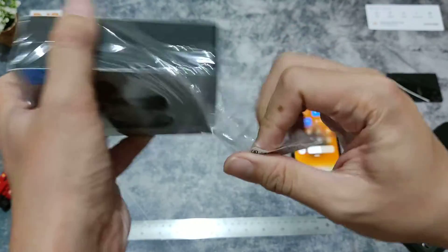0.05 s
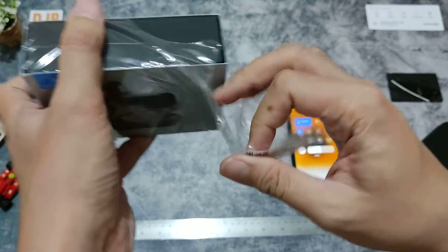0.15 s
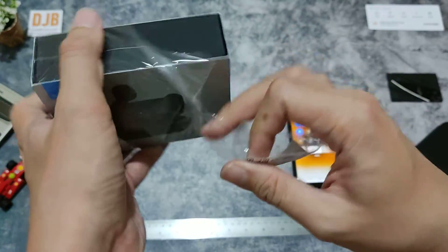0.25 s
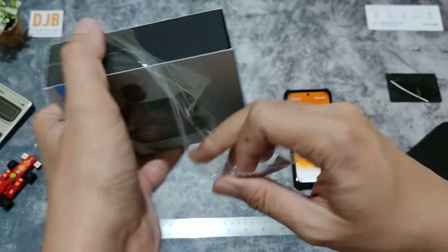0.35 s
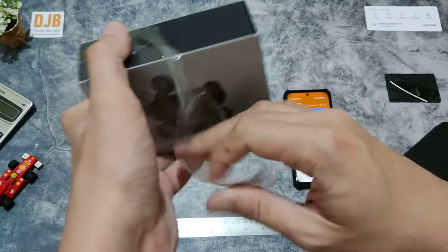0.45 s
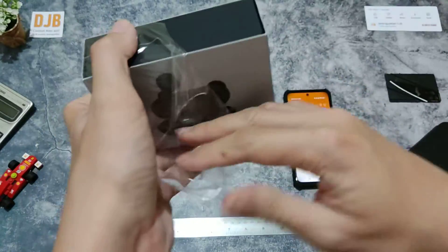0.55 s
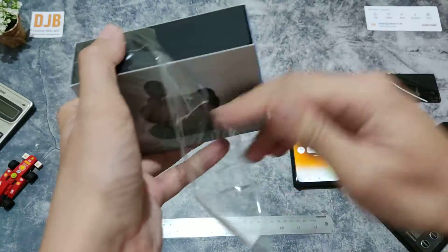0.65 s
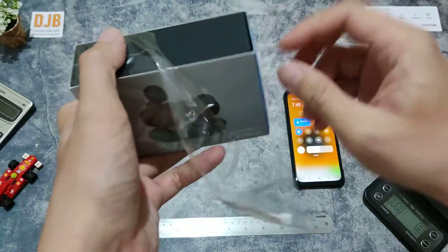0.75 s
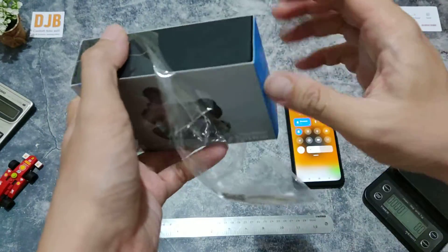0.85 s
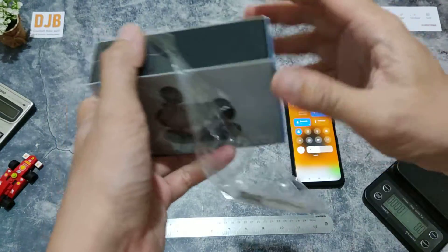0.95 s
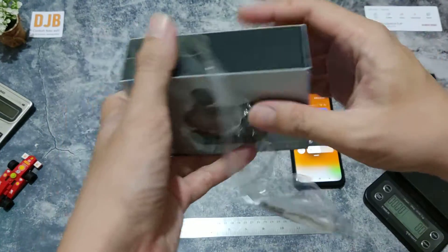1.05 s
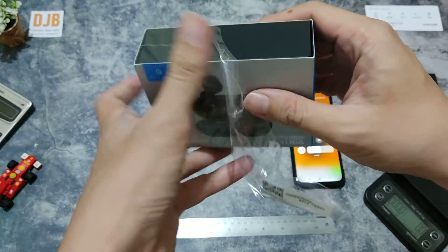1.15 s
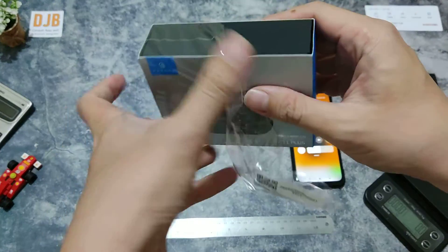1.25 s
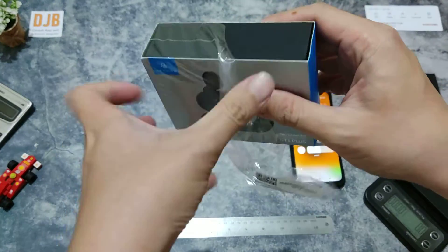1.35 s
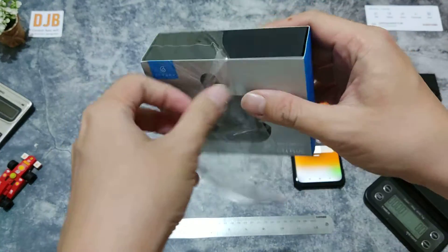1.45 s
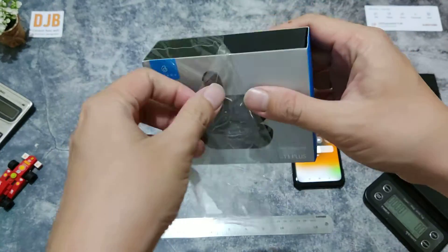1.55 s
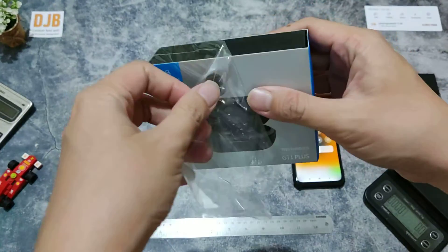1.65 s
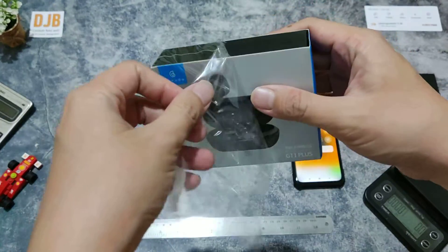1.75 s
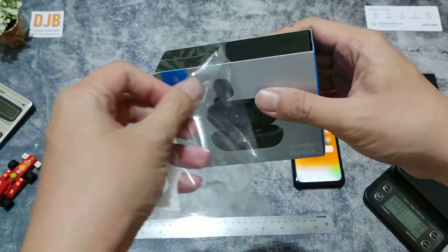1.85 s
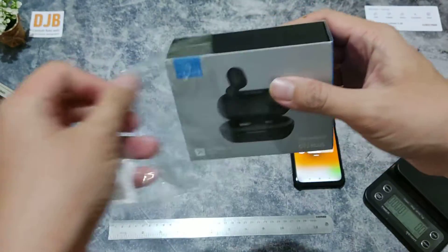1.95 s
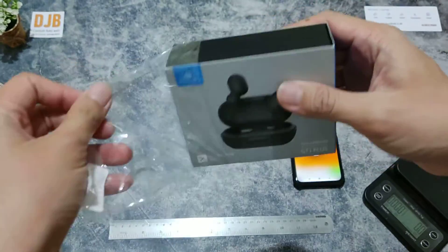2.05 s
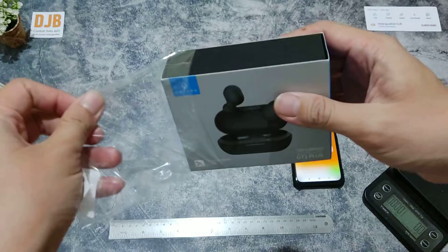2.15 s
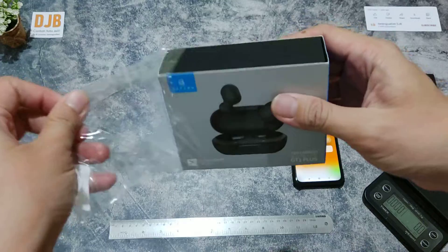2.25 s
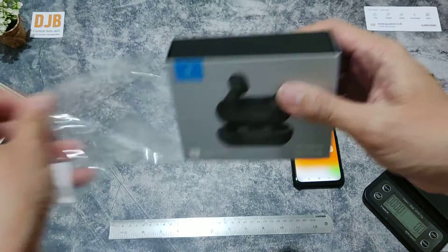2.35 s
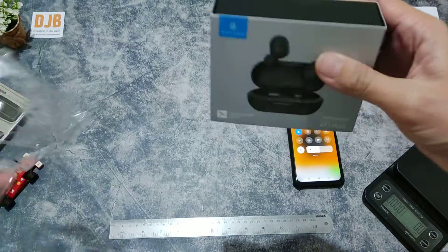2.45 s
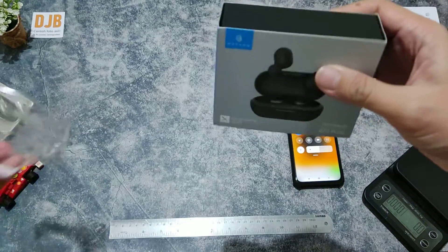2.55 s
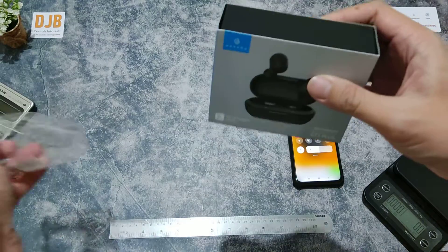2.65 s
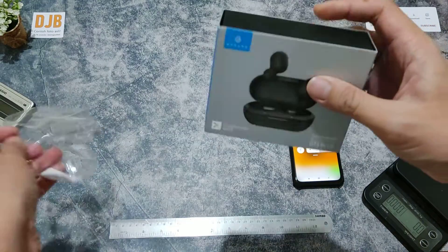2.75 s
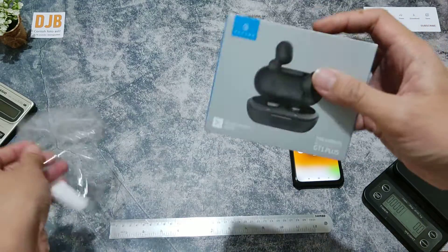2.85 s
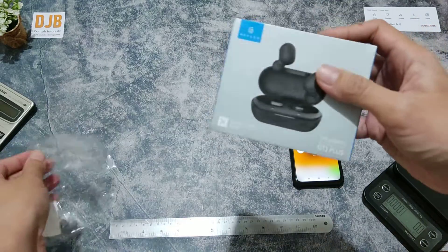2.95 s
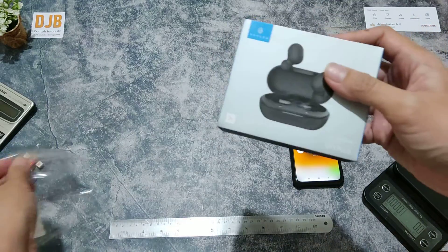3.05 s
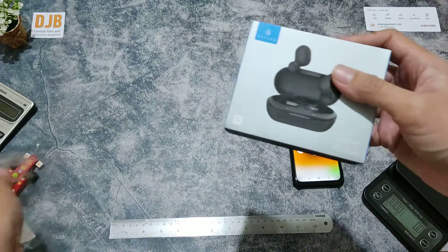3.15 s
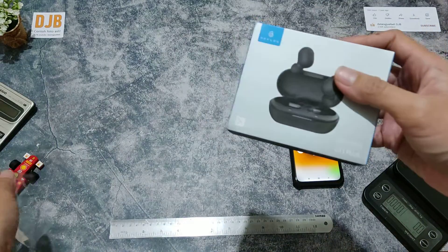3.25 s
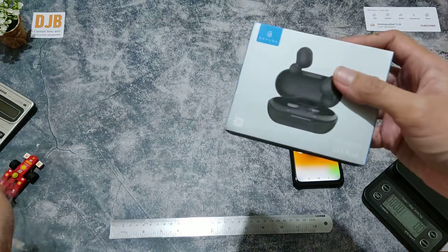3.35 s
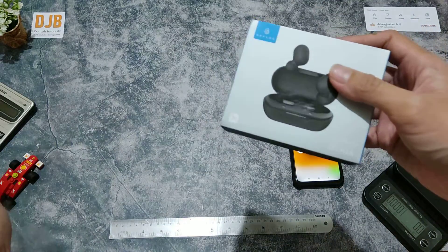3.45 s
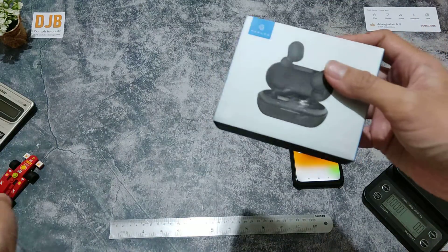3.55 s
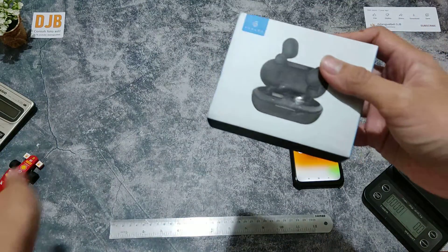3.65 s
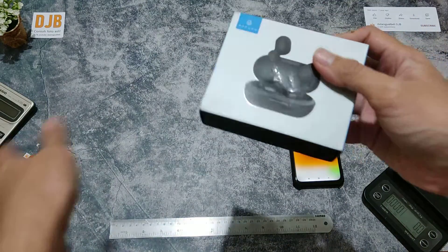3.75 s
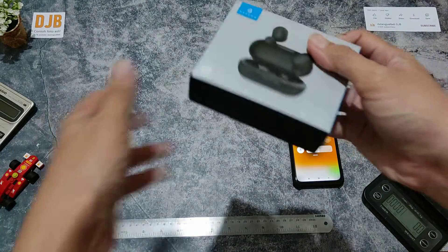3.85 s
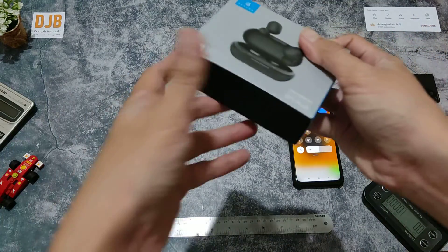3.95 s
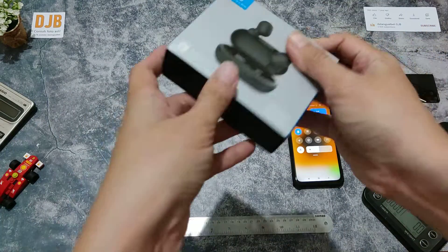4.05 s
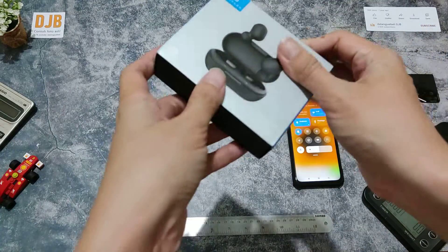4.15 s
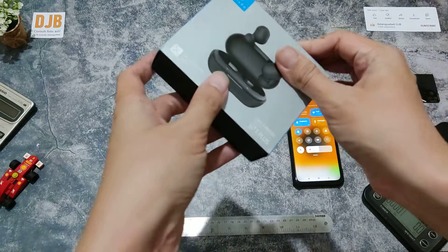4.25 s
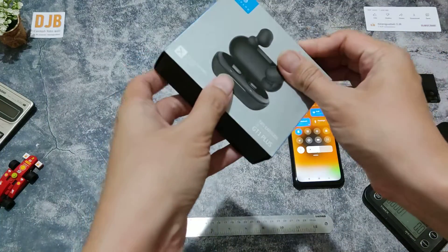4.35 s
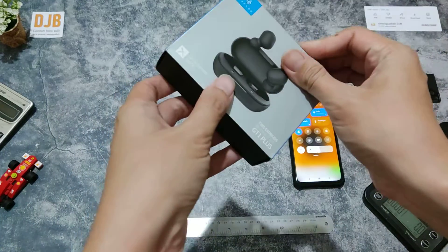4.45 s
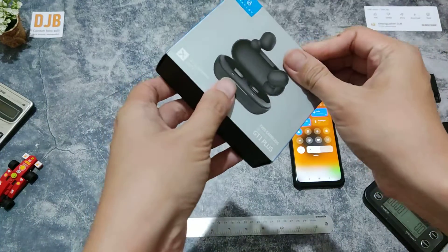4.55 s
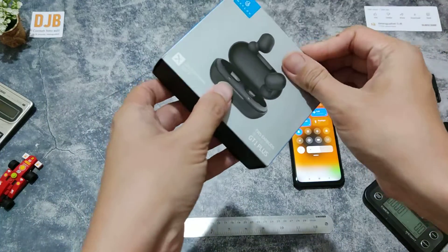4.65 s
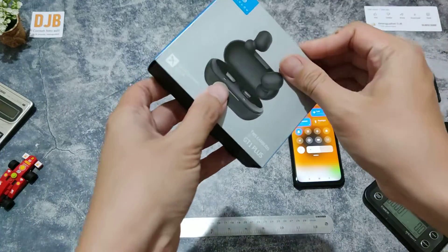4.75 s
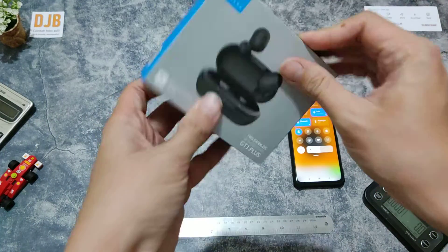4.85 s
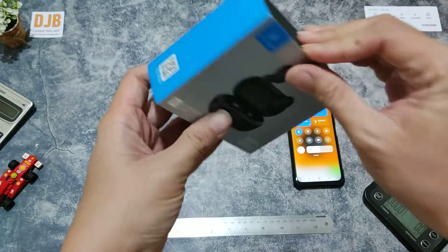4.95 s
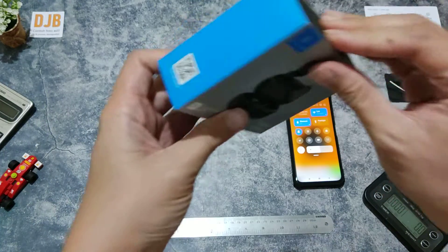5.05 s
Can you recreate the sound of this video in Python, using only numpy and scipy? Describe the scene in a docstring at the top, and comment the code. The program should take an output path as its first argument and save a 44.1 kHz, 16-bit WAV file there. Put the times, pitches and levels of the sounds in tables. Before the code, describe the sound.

Thin clear plastic film crackles and snaps loudly as it is torn off a small cardboard box, then quiet finger handling of the card.

```python
"""Thin plastic film is peeled off a small cardboard box close to two spaced microphones.
Sharp snaps, made of tight groups of ringing cracks, stand out over a dense crinkle of tiny ticks and hiss.
Knocks ring the box as short dying tones; later, fingers slide on the card with a softer scuff.
A quiet room rumbles behind with a faint tone. Near echoes and a short tail surround the handling;
the two microphone ports color the treble differently, and the level ducks after loud cracks."""
import sys
import numpy as np
from scipy import signal
from scipy.fft import rfft, irfft, next_fast_len
from scipy.io import wavfile
from scipy.ndimage import uniform_filter1d, map_coordinates

SR = 44100
rng = np.random.default_rng(int(sys.argv[2]) if len(sys.argv) > 2 else 0)


def wrap_up_sound(samples):
    """Save the sound to the file named by the first command line argument, as 16-bit audio."""
    columns = np.atleast_2d(samples).T
    # keep every value between -1 and 1, then stretch to whole-number steps
    tamed = np.clip(columns, -1, 1)
    steps = np.round(tamed * 32767).astype(np.int16)
    wavfile.write(sys.argv[1], SR, steps)


N = 225527


def amp(db):
    """Turn decibels into an amplitude factor."""
    return 10 ** (np.asarray(db) / 20)


def unit(x):
    """Scale a sound to an rms level of 1."""
    return x / np.sqrt(np.mean(x ** 2) + 1e-20)


def along(points, hz):
    """Read a curve of (frequency, value) points on a log frequency axis."""
    f, v = np.transpose(points)
    return np.interp(np.log(hz + 1), np.log(f + 1), v)


def wobble(rate):
    """A smooth random curve with rate knots a second."""
    knots = rng.standard_normal(int(N * rate / SR) + 4)
    return map_coordinates(knots, [np.arange(N) * rate / SR])


def filtered(x, response):
    """Multiply the spectrum of x by a function of frequency."""
    m = next_fast_len(N + SR // 2)
    return irfft(rfft(x, m) * response(np.fft.rfftfreq(m, 1 / SR)), m)[..., :N]


def struck(x, spectrum, size=4096):
    """Turn each impulse of x into a ring of this color that starts at once, with a peak of 1."""
    level_db = np.maximum(along(spectrum, np.fft.rfftfreq(size, 1 / SR)), -110)
    # folding the cepstrum gives the minimum-phase pulse: nothing sounds before the impulse
    cepstrum = irfft(np.log(amp(level_db)), size)
    cepstrum[1:size // 2] *= 2
    cepstrum[size // 2 + 1:] = 0
    pulse = irfft(np.exp(rfft(cepstrum)), size)
    return signal.fftconvolve(x, pulse[None] / np.abs(pulse).max(), axes=1)[:, :N]


# How alike left and right are in the noise: (frequency [Hz], correlation [-1 to 1])
LEFT_RIGHT_LIKENESS = [(25, 0.25), (60, 0.5), (130, 0.66), (290, 0.78), (640, 0.1), (1400, 0.2),
                       (3000, -0.14), (7000, -0.18)]


def rush(spectrum, patchy_db):
    """Stereo noise of rms 1 whose patches in time and pitch have random gain."""
    z = signal.stft(rng.standard_normal((2, N)), nperseg=512)[2]
    field = rng.standard_normal(z.shape[1:])
    field = uniform_filter1d(uniform_filter1d(field, 6, 0), 8, 1)
    pair = signal.istft(z * amp(patchy_db * unit(field)), nperseg=512)[1][:, :N]

    def mid_side_gains(hz):
        turn = np.arccos(np.clip(along(LEFT_RIGHT_LIKENESS, hz), -1, 1)) / 2
        return amp(along(spectrum, hz)) * [np.cos(turn), np.sin(turn)]

    mid, side = filtered(pair, mid_side_gains)
    return unit(np.array([mid + side, mid - side]))


def spikes(s, size, lag):
    """Stereo impulses; the right one comes lag seconds later."""
    at = [np.clip(np.round((s + side * lag / 2) * SR).astype(int), 0, N - 1) for side in (-1, 1)]
    return np.array([np.bincount(i.ravel(), g.ravel(), N) for i, g in zip(at, size)])


def sides(pan_db):
    """Left and right gains that differ by pan_db, left minus right."""
    return amp(np.array([pan_db / 2, -pan_db / 2]))


# Quiet room rumble: (frequency [Hz], relative level [dB per Hz])
ROOM_RUMBLE = [(11, -22), (20, 6.5), (33, -10.5), (48, -9), (87, -13.5), (134, -13.5), (241, -17.5),
               (300, -22), (730, -31), (1820, -39), (2270, -42), (5170, -41.5), (9210, -40), (14200, -47),
               (14600, -110)]
# Faint tone, before its slight wavering: (frequency [Hz], level [dB])
FAINT_TONE = (721, -80)
RUMBLE_DB = -54.5


def background():
    """Low room rumble, made of shaped noise, with a faint wavering sine tone."""
    hz, level_db = FAINT_TONE
    tone_gain = amp(level_db + 0.83 * wobble(5.75)) * np.sqrt(2)
    tone = tone_gain * np.sin(2 * np.pi * hz * np.arange(N) / SR + 0.41 * wobble(17))
    return amp(RUMBLE_DB + .4 * wobble(2)) * rush(ROOM_RUMBLE, patchy_db=.7) + tone


def creases(count):
    """Random stereo ticks in clumps, a few much stronger than the rest."""
    u = rng.random((count, 5))
    strength_db = np.minimum(-4.5 * np.log(u[:, 1]), 10.5)
    size = amp(strength_db) * np.sign(u[:, 2] - .5) * sides(8 * (u[:, 3] - .5))
    ticks = spikes(u[:, 0] * N / SR, size, .0007 * (u[:, 4] - .5))
    return ticks * amp(3 * wobble(150))


def swells(rows, slower):
    """Each movement swells, holds and dies away, straight in dB: its power at each millisecond."""
    s, hold, db, rise, fall = np.transpose(rows)[:5, :, None]
    t = np.arange(0, N / SR + .001, .001) - s
    away = np.maximum(np.maximum((t - hold) / fall, -t / rise), 0)
    return amp(db - 20 / slower * away) ** 2


# Tugs and crumples of the film: (peak time [s], hold [s], rustle level [dB],
# rise [s per 20 dB], fall [s per 20 dB], box body over the rustle [dB])
FILM_TUGS = [(.0, .06, -43, .05, .1, -17), (.097, .065, -25.5, .012, .06, -18),
             (.195, .025, -35, .1, .1, -18), (.31, .02, -47, .1, .1, -16), (.375, .025, -39, .12, .04, -19),
             (.445, .01, -37, .025, .07, -14), (.52, .035, -37, .15, .12, -21),
             (.65, .14, -47.5, .1, .13, -13), (.8, .02, -52, .03, .14, -18), (.91, .02, -56, .02, .2, -8),
             (.97, .03, -51, .02, .09, -17), (1.088, .005, -58, .12, .1, -21),
             (1.162, .05, -44, .03, .12, -16), (1.425, .01, -58, .04, .15, -19),
             (1.485, .03, -50, .03, .15, -12), (1.59, .015, -44, .15, .09, -17),
             (1.698, .037, -39, .006, .17, -16), (1.801, .005, -42, .08, .1, -23),
             (1.867, .005, -31.5, .025, .12, -42), (1.985, .04, -45, .04, .1, -15),
             (2.07, .025, -31.5, .07, .12, -18), (2.14, .01, -42, .1, .12, -19),
             (2.228, .02, -46, .01, .1, -20), (2.28, .03, -38, .03, .15, -20),
             (2.37, .04, -37, .12, .1, -20), (2.43, .005, -26, .04, .06, -19),
             (2.47, .025, -36, .04, .05, -18), (2.55, .05, -51.5, .05, .1, -13),
             (2.63, .01, -47, .03, .1, -10), (2.66, .04, -40, .05, .15, -21),
             (2.97, .01, -59, .1, .13, -12), (3.078, .005, -58, .12, .14, -13),
             (3.44, .06, -58, .08, .17, -11), (3.66, .02, -58, .03, .1, -20), (3.7, .01, -53, .03, .2, -23),
             (3.752, .02, -46, .02, .2, -24)]
# Fingers sliding on the card: (peak time [s], hold [s], rustle level [dB],
# rise [s per 20 dB], fall [s per 20 dB], box body over the rustle [dB], scuff over the rustle [dB])
CARD_SLIDES = [(2.9, .55, -72, .3, .3, 2, -3), (3.955, .025, -47, .04, .07, -17, -22),
               (3.98, .015, -60, .03, .03, -8, -2), (4.085, .11, -49, .06, .08, -15, -24),
               (4.303, .01, -58, .03, .035, -7, -4), (4.4, .01, -60, .03, .05, -8, -2),
               (4.44, .14, -60.5, .15, .06, -7, -7), (4.645, .05, -50, .025, .12, -12, -18),
               (4.885, .08, -57, .03, .1, -8, -22), (4.93, .01, -55, .04, .05, -8, -20),
               (5.008, .03, -35.5, .04, .08, -18, -24), (5.05, .015, -38, .05, .06, -13, -14)]
# Hands never rest, so these stay underneath: (rustle level [dB], body level [dB], scuff level [dB])
IDLE_LEVELS = (-77, -75, -84)
TUG_SCUFF_DB = -28  # skin scuff under a tug, over its rustle
GRAINY_FILM, GRAINY_CARD = .52, .35  # share of crinkle grains, 0-1
LINGER = 1.15  # body and scuff swell and fade this many times slower than the rustle


def motion():
    """Rustle, body and scuff in dB and the share of grains, summed over all movements."""
    film, card = swells(FILM_TUGS, 1).sum(0), swells(CARD_SLIDES, 1).sum(0)
    tugs, slides = swells(FILM_TUGS, LINGER), swells(CARD_SLIDES, LINGER)
    film_body = np.transpose(FILM_TUGS)[5]
    card_body, card_scuff = np.transpose(CARD_SLIDES)[5:]
    rustle = film + card
    body = amp(2 * film_body) @ tugs + amp(2 * card_body) @ slides
    scuff = amp(2 * TUG_SCUFF_DB) * tugs.sum(0) + amp(2 * card_scuff) @ slides
    levels = [10 * np.log10(p + amp(2 * idle)) for p, idle in zip([rustle, body, scuff], IDLE_LEVELS)]
    share = (GRAINY_FILM * film + GRAINY_CARD * card) / (film + card + 1e-30)
    ms = np.arange(N) / SR * 1000
    return [np.interp(ms, np.arange(len(film)), curve) for curve in levels + [share]]


# Bright film rustle: (frequency [Hz], relative level [dB per Hz])
RUSTLE_COLOR = [(1500, -30.5), (4500, -17.5), (7800, -9.5), (9100, 0), (10000, -4.5), (11100, -2),
                (12200, -11), (14200, -14.5), (14500, -77), (15000, -105)]
# Duller part carried by the box: (frequency [Hz], relative level [dB per Hz])
BODY_COLOR = [(250, -8.5), (450, -6), (700, -10), (1150, -4), (1800, -7.5), (3000, -5), (5000, -5.5),
              (7500, -35), (14000, -87)]
# Skin on card: (frequency [Hz], relative level [dB per Hz])
SCUFF_COLOR = [(500, -63), (1500, -8), (2200, 0), (2900, -4), (4500, -39.5), (14000, -90)]
LEAN_DB = -.7  # average left-right balance of the rustle


def handling():
    """Tiny creases crackle over the hiss of sliding skin and film; the box carries a duller part."""
    rustle_db, body_db, scuff_db, share = motion()
    share = np.clip(share, 0, 1)

    def crackle_and_hiss(ticks, color):
        crackle = unit(struck(ticks, color))
        return np.sqrt(share) * crackle + np.sqrt(1 - share) * rush(color, patchy_db=2)

    film, card = creases(count=12000), creases(count=5000)
    flutter = amp(.8 * wobble(60))
    balance = sides(LEAN_DB + 2 * wobble(15))
    rustle = amp(rustle_db) * balance * crackle_and_hiss(film, RUSTLE_COLOR)
    body = amp(body_db) * crackle_and_hiss(film + card, BODY_COLOR)
    scuff = amp(scuff_db) * crackle_and_hiss(card, SCUFF_COLOR)
    return flutter * (rustle + body + scuff)


# Lesser snaps: level over the film rustle, typical spread, average dull part
SMALL_DB, SMALL_SPREAD_MS, SMALL_DULL_DB = 2.5, .5, -22


def small_snaps(count):
    """Rows of lesser snaps at random times, their strength following the tugs of the film."""
    s, g = rng.uniform(0, N / SR, count), rng.standard_normal((count, 4))
    film = swells(FILM_TUGS, 1).sum(0)[(s * 1000).astype(int)]
    db = 10 * np.log10(film + 1e-30) + SMALL_DB + 2.5 * g[:, 0]
    spread_ms = SMALL_SPREAD_MS * np.exp(.3 * g[:, 2])
    return np.transpose([s, db, 4 * g[:, 1], spread_ms, SMALL_DULL_DB + 5 * g[:, 3]])


# Loud film snaps, as settings for the steps below:
# (time [s], strength [dB], left-right [dB], spread [ms], dull part [dB])
LOUD_SNAPS = [(.036, -17, -5.5, .46, -21), (.052, -21, -6.5, .4, -30), (.0701, -19.5, -1.5, .7, -20),
              (.079, -29, 0, 1, -24), (.0905, -3, 2.5, .8, -19), (.0995, -19, 3, 1, -25),
              (.1072, -13, 4.5, 1, -28), (.109, -5.5, 5.5, .8, -23), (.1225, -20, 4, 1.5, -24),
              (.1365, -21, 4, .8, -24), (.1455, -20, 4, 1, -24), (.1573, -17, 7, 2.2, -21),
              (.167, -20, 4, .5, -26), (.209, -26, 0, .8, -18), (.278, -28, -3, .8, -22),
              (.284, -23, -4, .69, -23), (.3432, -20, 2.5, .9, -21), (.3484, -17, -5, .4, -28),
              (.3805, -25, 0, .8, -24), (.405, -27, 0, .5, -22), (.4305, -24, 0, .5, -20),
              (.444, -18, -3.5, .76, -21), (.449, -21, 3, .9, -28), (.4562, -21, 3.5, .78, -19),
              (.4715, -24, 4, 1.4, -28), (.4867, -14.5, -.5, .65, -20), (.4953, -22, 0, .45, -25),
              (.5211, -12.5, -5, .48, -19.5), (.5306, -16, -7.5, .82, -22), (.5437, -19, 0, .47, -28),
              (.5564, -15, -.5, .7, -20), (.5675, -27, 0, .5, -24), (.5881, -19.5, -1.5, .82, -18.5),
              (.627, -21, -.5, .47, -23), (.6492, -30, -6.5, .83, -16), (.665, -30, -2, 1.2, -24),
              (.693, -33, 0, .6, -15), (.7004, -22, -2.5, .39, -21), (.733, -31, -4, .7, -22),
              (.7414, -29, -3, 1.1, -25), (.7562, -27, 3, .58, -27), (.7904, -14, -.5, .48, -30.5),
              (.809, -34, .5, .74, -12), (.907, -23.5, 2.5, .7, -18.5), (.9704, -28, 3, .8, -19),
              (1.143, -40, 0, .8, -22), (1.159, -31, 1.5, .89, -22), (1.2165, -28.5, 4.5, .59, -35),
              (1.2246, -30, 5, .91, -24), (1.237, -34, 3, .8, -22), (1.404, -46, 0, 1, -22),
              (1.4228, -28, -3.5, .43, -30), (1.4818, -35, -1, .55, -18), (1.5031, -31.5, 2, 1.4, -26),
              (1.5424, -31.5, 5, .54, -15.5), (1.566, -33, 3, .7, -22), (1.5957, -23.5, 2, .81, -30),
              (1.6085, -25, 4.5, .54, -24), (1.6963, -12, -.5, .46, -29), (1.7005, -26, 0, .5, -26),
              (1.7162, -12.5, -.5, .44, -24), (1.7208, -25, 0, .8, -24), (1.733, -17.5, 2.5, .85, -22.5),
              (1.7533, -22, 2.5, .51, -18), (1.7628, -24, -4.5, .67, -17), (1.7934, -8.5, -4, .54, -21),
              (1.8048, -19, -1.5, .37, -29), (1.8082, -26, 0, .5, -25), (1.8627, -5, 2, .55, -26.5),
              (1.8657, -15, -2, .95, -18), (1.8837, -4, 2.5, .5, -24.5), (2.012, -27, 4.5, .5, -19),
              (2.031, -30, 2, .6, -24), (2.036, -28, 2, .6, -24), (2.0418, -17.5, 3.5, 1.2, -21),
              (2.054, -19, 2.5, .58, -22), (2.0632, -16, 0, .48, -29), (2.0788, -15.5, -1, .68, -23),
              (2.0868, -13, -3, .6, -25), (2.0896, -17, -6, .82, -30), (2.107, -23, 1, .8, -24),
              (2.1595, -22.5, 1, .84, -17), (2.17, -30, 0, 1.5, -24), (2.1793, -23, -1, .4, -22),
              (2.1905, -33, 0, .7, -24), (2.2233, -12, 1, .55, -27.5), (2.252, -29, 0, .5, -20),
              (2.2571, -22, 0, .8, -9), (2.2693, -9.5, -6, .55, -21), (2.2925, -25, 0, .7, -24),
              (2.299, -26, 0, .6, -24), (2.323, -23, 1, 1.1, -24), (2.3963, -17, 2, .47, -27),
              (2.4, -19, 0, .4, -20), (2.4052, -15, -.5, .91, -35), (2.4098, -20, 0, .4, -20),
              (2.417, -22, 0, .8, -24), (2.4283, -9.5, -1, 1.1, -20), (2.4335, -10, -2.5, .6, -20),
              (2.4355, -10, -3, .7, -22), (2.4376, -14, -2, .5, -22), (2.4444, -17, 0, .5, -22),
              (2.4605, -22, 0, .9, -18), (2.488, -25, 2, 1.5, -24), (2.55, -26, 5.5, .6, -24),
              (2.576, -40, 0, 1, -24), (2.6055, -40, 0, .4, -24), (2.62, -32, -1.5, .97, -20),
              (2.6312, -26.5, 6.5, .81, -13.5), (2.638, -32, 0, .7, -16), (2.6475, -28, -3, .8, -18),
              (2.66, -31, -3, .7, -24), (2.6637, -16, -6.5, .25, -22), (2.6655, -22, -5, .5, -22),
              (2.6717, -16, -7.5, .3, -23), (2.6748, -27, -4, .5, -24), (2.6985, -27, 0, .8, -20),
              (2.7092, -25, -.5, .74, -20), (2.72, -32, 0, .4, -24), (2.731, -31, -1, .6, -20),
              (2.7355, -31, 0, .6, -22), (2.9731, -32.5, -9, .41, -23), (3.05, -43, -5, .69, -12),
              (3.0684, -36.5, -4, 1, -18), (3.0858, -37, 0, .81, -16), (3.471, -36, -1, .9, -17),
              (3.654, -39, -5, .5, -15.5), (3.6928, -5.5, 4, .12, -40), (3.697, -24, 2, .15, -40),
              (3.7464, -29, 2, 1, -22), (3.754, -34, 2, 1, -24), (3.762, -34, 2, 1, -24),
              (3.778, -36, 2, 1, -24), (4.046, -42, 2, .7, -22), (4.061, -35, 3.5, .8, -22),
              (4.634, -42, -1, .8, -17), (4.8827, -37.5, 2.5, .97, -11), (4.993, -30, -3, .5, -17)]
# Bright ring of a snap: (frequency [Hz], relative level [dB per Hz])
SNAP_COLOR = [(4000, -66), (6300, -14), (8000, -4.5), (9000, 1.5), (10000, -2), (11000, -0.5),
              (12000, -9.5), (13500, -27), (15000, -57.5)]
# A taut crease, almost pure ring: (frequency [Hz], relative level [dB per Hz])
TAUT_COLOR = [(5000, -67), (7800, -24), (8900, -11), (9700, -0.5), (10800, -0.5), (11500, -5), (14000, -34),
              (16500, -75)]
# Dull part of a snap: (frequency [Hz], relative level [dB per Hz])
DULL_COLOR = [(600, -34), (1200, -9), (2500, -4.5), (4500, 6), (7000, 11), (10000, -54.5), (14000, -84)]
# Sharp edge of a snap: (frequency [Hz], relative level [dB per Hz])
EDGE_COLOR = [(9000, -52), (12000, -3.5), (13900, -4), (14500, -16), (15500, -24), (16600, -37)]
# Sharp edge: base level; dB more for each dB of strength and for each dB that it leans left
EDGE_DB, EDGE_GROWS, EDGE_GAINS_LEFT = -12.5, .2, .7
FADE_DB = 1.6  # a weaker crack loses this much for each spread away from the main one


def snaps():
    """Each crease gives way with a main crack amid weaker ones; the nearer port hears the main one first."""
    rows = np.vstack([LOUD_SNAPS, small_snaps(count=150)])
    s, db, pan_db, spread_ms, dull_db = rows.T[..., None]
    u = rng.random((len(s), 4, 20))
    minor = np.arange(20) > 0  # the first of 20 cracks is the main one
    spread = np.clip(spread_ms / 1000, .0001, .004)
    # about a quarter of the weaker cracks come before the main one, the rest after it
    direction = np.where(u[:, 3] < .25, -.5, 1.7)
    offset = (.0003 / 1.7 - np.log(u[:, 0]) * spread) * direction * minor
    brief_db = -18 * np.log10(np.minimum(spread / 0.00078, 1))  # brief snaps are nearly a lone crack
    weaker_db = 1.1 + 8 * u[:, 1] + FADE_DB * np.abs(offset) / spread + brief_db
    size = amp(db - 1.7 - minor * weaker_db) * np.sign(u[:, 2] - .5) * sides(pan_db)
    lag = .00004 * pan_db + .0002 * (u[:, 2] - u[:, 1]) * minor
    taut = np.clip((-dull_db - 30) / 8, .01, .99)  # the less dull sound, the purer the ring
    loose_db = 10 * np.log10(1 - taut)
    edge_db = EDGE_DB + EDGE_GROWS * db + EDGE_GAINS_LEFT * pan_db + loose_db
    parts = [(SNAP_COLOR, loose_db), (TAUT_COLOR, 10 * np.log10(taut) + 1.1),
             (DULL_COLOR, dull_db + 8), (EDGE_COLOR, edge_db)]
    when = s - .0004 + offset
    return sum(struck(spikes(when, size * amp(part_db), lag), color) for color, part_db in parts)


# Lesser knocks: level over the box body; average setting of their deep and low modes
SMALL_KNOCK_DB, SMALL_DEEP_DB = 1, -12


def small_knocks(count):
    """Rows of lesser knocks at random times, their strength following the box body."""
    s, g = rng.uniform(0, N / SR, count), rng.standard_normal((count, 4))
    db = motion()[1][(s * SR).astype(int)] + SMALL_KNOCK_DB + 3 * g[:, 0]
    deep_db, low_db = SMALL_DEEP_DB + 4 * g[:, 1], SMALL_DEEP_DB + 4 * g[:, 2]
    return np.transpose([s, db, deep_db, low_db, 3 * g[:, 3]])


# Box knocks: (time [s], strength [dB], deep modes [dB], low modes [dB], high modes [dB])
BOX_KNOCKS = [(.0685, -37, -23, -17, 3), (.09, -38, -6, -5, 8), (.094, -42, -8, -8, 6),
              (.108, -36, -6, -3, 4), (.21, -47, -10, -4, 0), (.28, -41, -19, -30, -1),
              (.455, -47, -13, -20, 6), (.699, -52, -14, -10, 0), (.807, -40, -18, -3, -7),
              (.905, -37, -13, -17, -3), (1.158, -43, -4, -4, 4), (1.206, -43, -11, -6, 0),
              (1.215, -37, -20, -30, -2), (1.695, -48, -15, -21, 0), (1.713, -43, -18, -13, 0),
              (1.732, -46, -12, -16, 0), (1.76, -48, -11, -13, 0), (1.804, -44, -16, -20, 0),
              (1.863, -42, -20, -19, 0), (1.882, -44, -21, -19, 0), (1.992, -49, -8.5, -14, 0),
              (2.04, -47.5, -11, -12, 0), (2.087, -38, -10, -9, 0), (2.14, -42, -5, -14, 4),
              (2.156, -44, -19, -19, 0), (2.179, -46, -4, -18, 0), (2.269, -35, -20, -16, 7),
              (2.271, -46, 14.5, 0, 0), (2.368, -43, -12, -6, 2), (2.4, -47, -5, -3, 8),
              (2.4265, -21.5, -8, -11, -4), (2.452, -42, 0, -6, -2), (2.865, -50, -1, -11, 0),
              (2.993, -52, -10, -10, 0), (3.979, -60, 2, 8, 0), (4.047, -58, -5, -5, 4),
              (4.051, -60, 2, 12, 0), (4.062, -60, 0, 4, 0), (4.177, -58, -8, -6, 0),
              (4.88, -50, -14, -10, 4), (4.93, -54, -12, -10, 3), (4.988, -44, -11, -8, -5),
              (5.047, -48, -18, -14, 8), (5.062, -50, -16, -14, 7)]
# Ways the box rings under the hardest tap: (frequency [Hz], relative level [dB], time to fall 60 dB [s])
BOX_MODES = [(124, -12, .045), (245, 4, .032), (349, -6.5, .15), (430, 10, .022), (555, 7, .02),
             (710, -5, .014), (863, -3, .018), (1020, -1.5, .028), (1248, -1, .026), (1450, -3, .02),
             (2160, -4, .012)]
SOFT_DAMPS = .08  # a tap loses this many dB of ring time for each dB under the hardest
DRIFT = .15  # share by which the modes of the softest taps scatter with the grip


def knocks():
    """Fingers and jerks of the film tap the box, which rings briefly in several dying tones."""
    out, t = np.zeros((2, N + SR)), np.arange(SR // 10) / SR
    hardest_db = np.max(np.transpose(BOX_KNOCKS)[1])
    for s, db, deep_db, low_db, high_db in np.vstack([BOX_KNOCKS, small_knocks(count=30)]):
        soft = amp(SOFT_DAMPS * (db - hardest_db))  # falls below 1 as the tap gets softer
        tap_modes = BOX_MODES * np.array([1 + DRIFT * (1 - soft) * rng.normal(), 1, soft])
        for hz, level, t60 in tap_modes:
            band_db = deep_db if hz < 400 else low_db if hz < 600 else high_db if hz > 1100 else 0
            ring = amp(level + band_db - 60 * t / t60) * (1 - np.exp(-t / 0.00065))
            gain = amp(db - 3 + rng.normal(0, 2) + rng.normal(0, 1.5, (2, 1)))
            # the tone starts at a slightly different point of its cycle on each side
            turn = rng.normal(0, .6) + 2 * np.pi * hz * rng.normal(0, 0.000082, (2, 1))
            out[:, round(s * SR):][:, :len(t)] += gain * ring * np.sin(2 * np.pi * hz * t + turn)
    return out[:, :N]


# Echoes off table and hands; the right port gets each 1.15 times as late: (delay [s], level [dB])
NEAR_ECHOES = [(.0009, -21), (.0032, -19.5), (.0045, -24.5)]
# How long the tail lasts: (frequency [Hz], time to fall 60 dB [s])
TAIL_TIMES = [(200, 0.66), (2000, 0.1), (10000, 0.14)]


def room(x, wet_db):
    """Near surfaces send quick copies, a little different at each port; the walls add a tail."""
    hz, t, z = signal.stft(rng.standard_normal((2, SR // 2)), SR, nperseg=256)
    decay = amp(-60 * t / along(TAIL_TIMES, hz)[:, None])
    tail = signal.istft(z * decay, SR, nperseg=256)[1]
    answer = np.pad(amp(wet_db) * tail / np.linalg.norm(tail[0]), ((0, 0), (300, 0)))
    answer[:, 0] = 1  # the direct sound
    for s, db in NEAR_ECHOES:
        answer[[0, 1], np.round(SR * s * np.array([1, 1.15])).astype(int)] += amp(db)
    return signal.fftconvolve(x, answer, axes=1)[:, :N]


def scene():
    """Snaps and knocks in the room, the handling in a stronger tail, and the quiet background."""
    hits = room(snaps() + knocks(), wet_db=-20.5)
    rustle = room(handling(), wet_db=-15)
    return hits + rustle + background()


# Treble of the two ports; the right rings lower than the left: (frequency [Hz], left-right [dB])
PORT_BALANCE = [(5000, 0), (7000, -1.5), (8900, -8), (9800, 0), (11000, 7.5), (12500, 6), (15000, 3)]
TOP_HZ = 16650  # band limit


def record(dry):
    """Each port has its own treble; gain control ducks after loud cracks and recovers; the top is cut."""
    def port_gains(hz):
        balance_db = along(PORT_BALANCE, hz) * np.array([[-1], [1]])
        return np.sqrt(2 / (1 + amp(2 * balance_db)))

    ports = filtered(dry, port_gains)
    loudness = uniform_filter1d(np.abs(ports).max(0), 64)
    over = np.maximum(loudness / amp(-16), 1)  # loudness over a threshold of -16 dB
    keep = np.exp(-1 / (.06 * SR))  # smoothing time 0.06 s
    duck = np.abs(signal.lfilter([1 - keep], [1, -keep], np.log(over)))
    return filtered(ports * np.exp(-40 * duck), lambda hz: hz < TOP_HZ)


dry = scene()
out = record(dry)
wrap_up_sound(out)
```